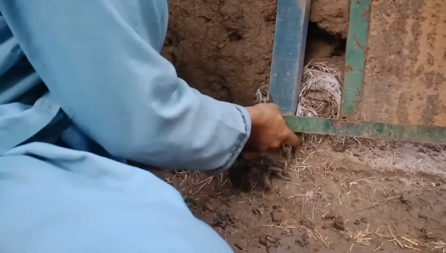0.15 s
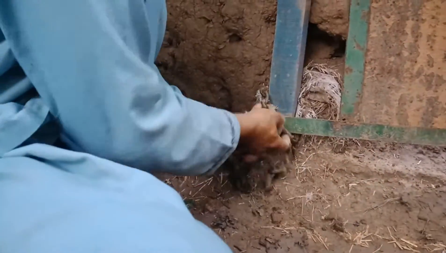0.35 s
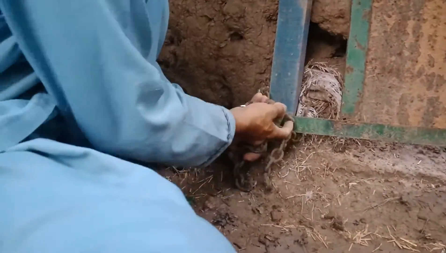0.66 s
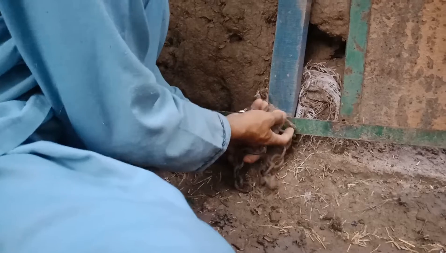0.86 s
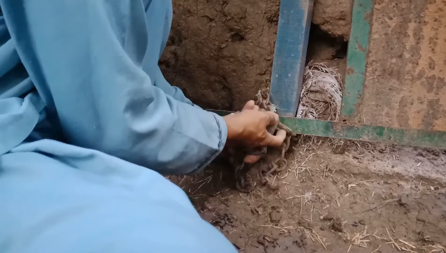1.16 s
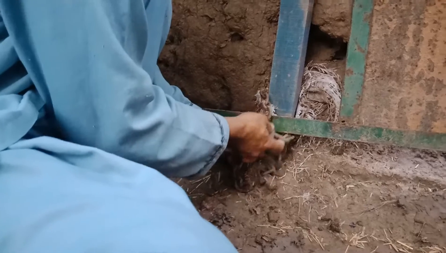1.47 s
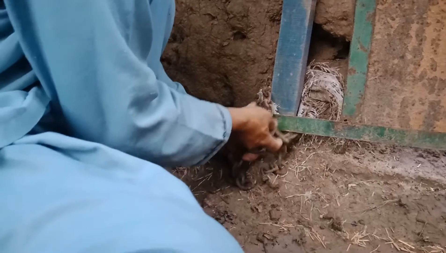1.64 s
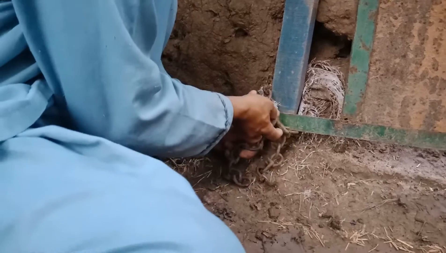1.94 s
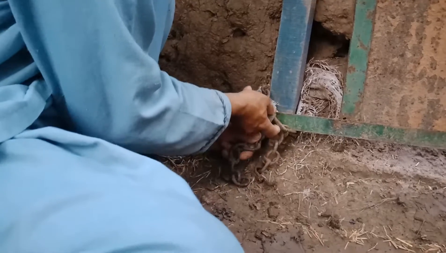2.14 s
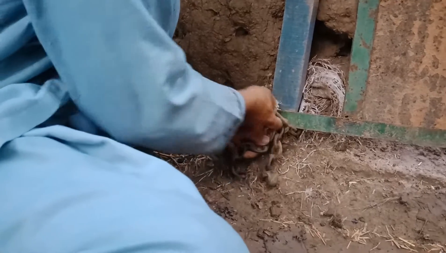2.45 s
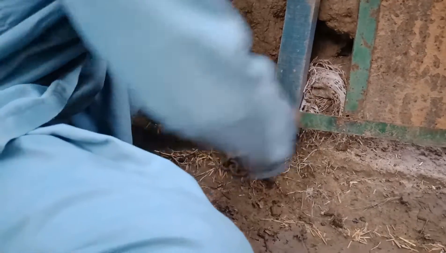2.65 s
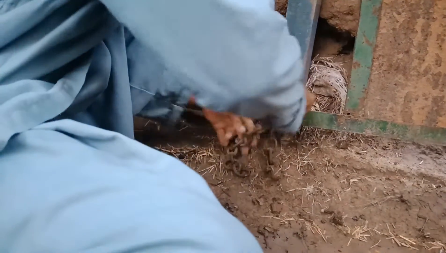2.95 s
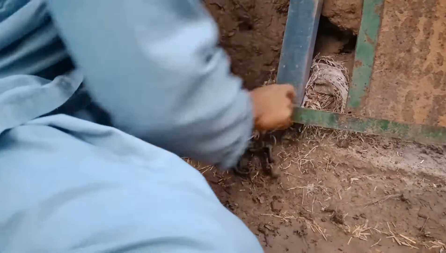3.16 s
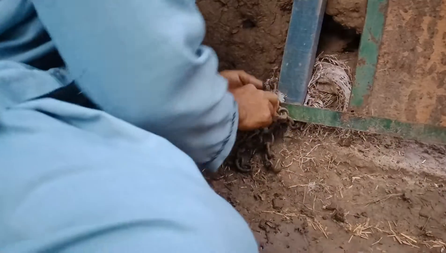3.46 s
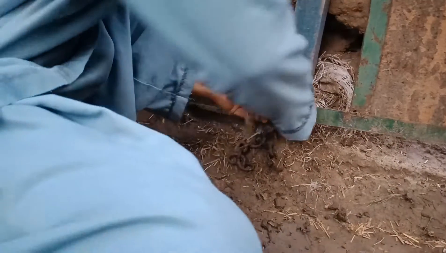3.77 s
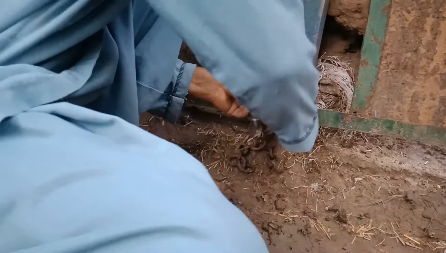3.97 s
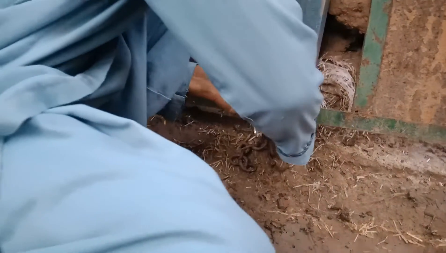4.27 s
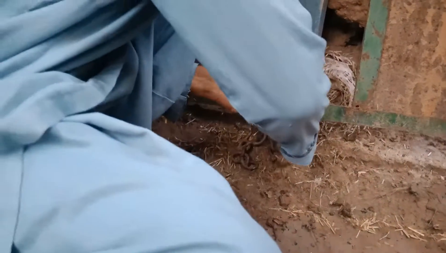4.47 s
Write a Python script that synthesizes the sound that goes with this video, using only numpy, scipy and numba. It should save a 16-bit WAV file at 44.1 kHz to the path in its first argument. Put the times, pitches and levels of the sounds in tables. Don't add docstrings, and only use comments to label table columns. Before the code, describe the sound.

Outdoor yard, stereo phone recording from roughly a metre. Heavy chain links knock a metal frame in irregular short bursts, each with a dry crack and brief hollow ring, mixed with gritty drags and tiny high link ticks. The strongest cluster comes just after the middle; then it thins to scattered clinks and a final medium clank. Continuous high cricket chorus rises and falls about every half second, over soft air hiss and low hum.

```python
import sys
import numpy as np
from scipy import signal
from scipy.fft import rfft, irfft
from scipy.io import wavfile
from scipy.ndimage import uniform_filter1d
from numba import njit

SR = 44100
rng = np.random.default_rng(int(sys.argv[2]) if len(sys.argv) > 2 else 0)


def invert_db(level):
    return 10 ** (np.asarray(level, dtype=float) / 20)


def to_wav(s):
    ch = np.atleast_2d(s).T
    pcm = np.round(np.clip(ch, -1, 1) * 32767)
    wavfile.write(sys.argv[1], SR, pcm.astype(np.int16))


N = 203256


def read(table, hz):
    t = np.array(table)
    return np.interp(np.log(hz), np.log(t[:, 0]), t[:, 1])


def level(x, db):
    return x * invert_db(db) / np.sqrt(np.mean(x ** 2))


def walk(rate):
    k = int(SR / rate)
    held = np.repeat(rng.standard_normal(N // k + 1), k)
    return 1.3 * uniform_filter1d(uniform_filter1d(held, k), k)[:N]


def peak(hz, width):
    return lambda f: 1 / (1 + (2 * (f - hz) / width) ** 2)


def dull(x, hz, order):
    return signal.sosfilt(signal.butter(order, hz, fs=SR, output="sos"), x)


def band_pass(x, low_hz, high_hz, order):
    return signal.sosfilt(signal.butter(order, [low_hz, high_hz], "bandpass", fs=SR, output="sos"), x)


# pitch_hz, likeness (0 to 1)
COHERENCE = [(60, 0.84), (130, 0.99), (290, 0.93), (640, 0.74), (1410, 0.16), (3100, 0), (6820, 0.01),
             (15000, 0)]


def noise(gain):
    hz = np.maximum(np.fft.rfftfreq(N, 1 / SR), 1)
    alike = np.clip(read(COHERENCE, hz), 0, 1)
    mid, side = rfft(rng.standard_normal((2, N))) * gain(hz)
    mid, side = mid * np.sqrt(1 + alike), side * np.sqrt(1 - alike)
    return irfft(np.array([mid + side, mid - side]), N)


# start_s (of the #
# peak), level_db, half_length_s
DRONE_SWELLS = [(0.02, -48.5, 0.059), (0.416, -54, 0.32), (1.044, -51.5, 0.13), (1.38, -55.5, 0.12),
                (1.654, -55, 0.16), (1.946, -53, 0.14), (2.308, -58, 0.17), (2.582, -46, 0.085),
                (2.9, -51, 0.19), (3.25, -52.5, 0.046), (3.552, -58, 0.068), (3.997, -58, 0.2),
                (4.426, -53, 0.053), (4.62, -53, 0.082)]


def throb():
    s, db, half = np.transpose(DRONE_SWELLS)[:, :, None]
    bells = np.exp(-2 * ((np.arange(N) / SR - s) / half) ** 2)
    return np.sqrt(np.sum(invert_db(db) ** 2 * bells, axis=0))


SWELL_TOPS = [-0.53, 0.08, 0.68, 1.32, 1.91, 2.53, 3.06, 3.69, 4.32, 4.75]


def swell():
    t = np.arange(N) / SR
    turn = 2 * np.pi * np.interp(t, SWELL_TOPS, np.arange(len(SWELL_TOPS)))
    depth_db = 5 - 0.68 * t
    db = depth_db * (np.cos(turn) - 0.084 * np.cos(2 * turn))
    pan_db = -9.5 - 0.17 * db + 1.0 * walk(6.75)
    return -45.5 + db, pan_db


# pitch_hz, width_hz, level_db
SHED_DRONE = [(146, 3.9, -62.5), (189.3, 9.6, -68), (226, 40, -66)]
# pitch_hz, width_hz, level_db
FAR_INSECTS = [(7640, 77, -80), (9140, 460, -83)]
# pitch_hz, level_db (per Hz)
AIR_SPECTRUM = [(3470, -31.5), (5900, -9), (6650, -28.5), (7490, -10), (7960, -25), (8120, -20.5),
                (9410, -13.5), (10300, -18), (14400, -17), (15300, -18.5)]


def yard():
    wobble = np.cumsum(82.5 * (1 + 0.016 * walk(9.42))) / SR
    drone = level(np.sin(2 * np.pi * wobble), 0) * throb() * invert_db(0.5 * walk(12))
    drone = drone + sum(level(noise(peak(hz, width)), db) for hz, width, db in SHED_DRONE)
    rumble = level(noise(lambda f: (f / 60) ** 2.0 / (1 + (f / 95) ** 8)), -61.5)
    far = sum(level(noise(peak(hz, width)), db) * invert_db(4.7 * walk(3.3)) for hz, width, db in FAR_INSECTS)
    swelling = invert_db(0.59 * (swell()[0] + 45.5) + 3)
    edges, hiss = np.geomspace(5700, 15480, num=15), 0
    for lo, hi in zip(edges, edges[1:]):
        band = noise(lambda f: invert_db(read(AIR_SPECTRUM, f)) * (f >= lo) * (f < hi))
        patchy_db = 5 if lo < 8400 else 1.5
        hiss = hiss + band * invert_db(patchy_db * walk(7)) * (swelling if lo < 7000 else 1)
    low = (drone + rumble) * invert_db(np.array([[-1.0], [1.0]]))
    return low + far + level(hiss, -71.5) * invert_db(np.array([[.6], [-.6]]))


# pitch_hz, strokes_per_s, level_db
SINGERS = [(5100, 13, -9), (4750, 14, -7.5), (4820, 200, -12.5), (5050, 39, -1), (5320, 48, -5),
           (5107, 38, -1), (5304, 48, -3), (5170, 85, -1), (5065, 86, 0.5), (5190, 73, -2),
           (5490, 54, -8.5), (5500, 53, -9)]


def crickets():
    db, pan_db = swell()
    out, t = np.zeros((2, N)), np.arange(int(.08 * SR)) / SR
    for hz, rate, own_db in SINGERS:
        phase = np.cumsum(rate * (1 + 0.0662 * walk(8))) / SR % 1
        stroke = np.sin(np.pi * np.clip(phase / 0.64, 0, 1)) ** 2
        pitch_hz = hz * (1 + .02 * (.35 - phase) + 0.0055 * walk(7))
        wing = np.sin(2 * np.pi * np.cumsum(pitch_hz) / SR)
        song = wing * stroke * invert_db(0.98 * walk(10.0))
        paths = rng.standard_normal((2, len(t))) * np.exp(-t / 0.014)
        heard = signal.fftconvolve(song[None], paths, axes=1)[:, :N]
        out += [level(c, own_db) for c in heard]
    far = level(noise(peak(5200, 565)), -1.4) * invert_db(0.092 * (db - np.mean(db)))
    out = level(out, 0) + far
    return level(dull(out, hz=5630, order=20), 2.04) * invert_db(db + np.array([pan_db, -pan_db]) / 2)


# start_s, level_db
DRAG_EFFORT = [(0.0, -40), (0.28, -52.5), (0.72, -54), (0.88, -60), (1.2, -57.5), (1.55, -58.5),
               (1.79, -55), (2.27, -54.5), (2.5, -53.5), (2.64, -39), (2.73, -42), (3.0, -49), (4.0, -58.5),
               (4.21, -56.5), (4.38, -50), (4.6, -58)]
# pitch_hz, level_db (per Hz)
DRAG_COLOUR = [(24, -63), (40, -12), (76, 5), (108, 1.5), (170, 2), (286, -2.5), (442, -9), (1770, -18),
               (4170, -22.5), (4600, -14.5), (5980, -27), (10100, -120)]
# low_hz, high_hz, level_db (at middle effort), slope (dB per dB of effort), flicker_db
DRAG_PARTS = [
    (470, 1860, -58.5, 1, 3.5),
    (99, 436, -55.5, 0.77, 2),
    (1780, 4180, -59, 0.87, 3.5),
]


def drag():
    s, effort = np.transpose(DRAG_EFFORT)
    effort_db = np.interp(np.arange(N) / SR, s, effort) + 54
    out = 0
    for lo, hi, db, slope, flicker_db in DRAG_PARTS:
        def gain(f):
            return invert_db(read(DRAG_COLOUR, f)) / np.sqrt((1 + (lo / f) ** 8) * (1 + (f / hi) ** 16))
        out = out + level(noise(gain), 0) * invert_db(db + slope * effort_db + flicker_db * walk(20))
    return out * invert_db(np.array([[-1.2], [1.2]]))


# start_s, length_s, level_db, pitch_hz (band centre), width_octaves
SCRAPES = [(0.056, .09, -50, 3100, 2.8), (0.072, .07, -41, 1220, 0.83), (0.19, .12, -48, 1000, 1.8),
           (0.46, 0.19, -50.5, 1250, 2), (0.6, 0.31, -51.5, 870, 1.6), (1.07, 0.15, -55.5, 1430, 0.67),
           (1.05, 0.059, -49, 3700, 0.91), (1.157, 0.11, -55, 3500, 0.74), (2.46, 0.098, -51, 1310, 0.92),
           (2.502, 0.19, -42.5, 2200, 0.96), (2.724, 0.11, -30.5, 2600, 0.91), (2.74, 0.31, -40, 430, 1.6),
           (3.803, .08, -56, 1300, 1.6), (4.28, 0.11, -42.5, 1500, 2.4), (1.797, .07, -36, 3200, 0.8),
           (0.68, .08, -50, 3000, 1.1), (0.785, .06, -49, 3000, 0.99), (2.501, 0.025, -28, 1500, 2.2),
           (2.521, 0.12, -36.5, 700, 1), (3.2, .08, -48, 1200, 1.8), (3.446, .08, -53, 1000, 1.3),
           (4.292, 0.053, -41, 860, 0.91), (0.475, .08, -52, 2800, 1.2), (2.36, 0.22, -54, 2000, 2.6),
           (0.047, 0.064, -46, 700, 1.7), (2.748, .06, -28.5, 1200, 2.4), (0.552, 0.088, -45, 1700, 1.3),
           (1.793, 0.056, -42, 1350, 1.9), (4.04, 0.12, -55, 3000, 1.1), (3.143, .05, -52, 3200, 1.1)]


def scrapes():
    out = np.zeros((2, N))
    t = np.arange(int(.5 * SR)) / SR
    for s, length, db, hz, octaves in SCRAPES:
        grit = rng.standard_normal((3, len(t)))
        shared = grit[0] * np.clip(700 / hz, 0, 1.5)
        grit = (shared + grit[1:]) * invert_db(walk(150)[:len(t)])
        low_hz, high_hz = hz * 2 ** (np.array([-.5, .5]) * max(octaves, .2))
        band = band_pass(grit, low_hz, high_hz, order=2)
        envelope = (1 - np.exp(-t / 0.0055)) * np.exp(-(t / length) ** 2 * 2)
        i = int(s * SR)
        out[:, i:i + len(t)] += (level(band, db) * envelope)[:, :N - i]
    return dull(out, hz=4840, order=8) * invert_db(np.array([[-2.2], [2.2]]))


@njit
def add(out, start, push, pole, left, right, steps):
    for m in range(len(pole)):
        z = 0j
        for i in range(min(steps[m], out.shape[1] - start)):
            z = z * pole[m] + (push[i] if i < len(push) else 0.)
            out[0, start + i] += (left[m] * z).imag
            out[1, start + i] += (right[m] * z).imag


def strike(out, s, push, hz, t60, gain, chance, pan_db):
    alike = np.clip(read(COHERENCE, hz), 0, 1)
    phase = 3 * chance[0]
    apart = np.pi / 2 * np.sign(chance[2]) + .4 * chance[3]
    mid = np.sqrt(2 + 2 * alike) * np.exp(1j * phase)
    side = np.sqrt(2 - 2 * alike) * np.exp(1j * (phase + apart))
    left = gain * (mid + side) * invert_db(pan_db / 2)
    right = gain * (mid - side) * invert_db(-pan_db / 2)
    pole = np.exp(2j * np.pi * hz / SR - np.log(1000) / (t60 * SR))
    steps = (len(push) + .65 * t60 * SR).astype(np.int64)
    add(out, int(s * SR), push, pole, left, right, steps)


def press(hz, seconds):
    t = np.arange(int(seconds * SR)) / SR
    push = np.hanning(len(t)) * sum(np.sin(2 * np.pi * f * t) for f in hz)
    return 4 * push / len(t)


def rattle(length):
    t = np.arange(int(.15 * SR)) / SR
    grit = rng.standard_normal((2, len(t)))
    length = np.clip(length, .001, .04)
    decay = np.exp(-t / length) + 2.36 * np.exp(-t / 0.0027)
    push = grit[0] * invert_db(4.7 * grit[1]) * (1 - np.exp(-t / 0.00083)) * decay
    return (push / np.sqrt(np.sum(push ** 2)))[:int(6 * length * SR) + 400]


# start_s, level_db (peak), upper_db (share of the upper modes)
TINKLES = [(0.1251, -50, 5), (0.1494, -64, -5), (0.2064, -47.5, -10), (0.2488, -41, -12),
           (0.635, -28.5, -12), (2.7244, -57, -6), (2.9931, -49, -5), (3.0614, -64, -2), (3.1094, -56, -8),
           (3.6915, -41, -3), (3.719, -40, 5), (3.7994, -56, -4)]
# pitch_hz, level_db, t60_s
LINK_MODES = [(8000, 0.5, 0.016), (9940, -13.5, 0.023), (10900, -13, 0.14), (14800, -16, 0.1)]


def links():
    out, modes = np.zeros((2, N)), np.array(LINK_MODES)
    upper = modes[:, 0] > modes[0, 0]
    for s, db, upper_db in TINKLES:
        chance = rng.standard_normal((5, len(modes)))
        gain = invert_db(db - 7.5 + modes[:, 1] + np.clip(upper_db, -30, 4) * upper)
        hz = modes[:, 0] * (1 + 0.003 * chance[4])
        strike(out, s - .002, press(hz, 0.0065), hz, modes[:, 2], gain, chance, pan_db=-1.0)
    return out


# start_s, level_db (peak), pitch_hz, t60_s
TICKS = [(0.0427, -30, 7000, 0.061), (0.0994, -37, 6380, 0.099), (0.4694, -51, 6430, 0.07),
         (0.6789, -42, 5960, 0.06), (0.7093, -48, 7600, 0.06), (0.791, -36, 6130, 0.051),
         (1.6287, -41, 6160, 0.053), (1.7943, -61, 5940, 0.054), (2.5006, -31.5, 6000, 0.16),
         (2.737, -30, 6430, 0.14), (2.9944, -33, 6120, 0.072), (3.048, -48, 6830, 0.17),
         (3.148, -42, 6400, 0.068), (3.294, -31, 6650, 0.11), (3.3194, -54, 6390, 0.06),
         (4.2924, -70, 6000, 0.06)]


def ticks(count=24):
    out = np.zeros((2, N))
    for s, db, hz, t60 in TICKS:
        chance = rng.standard_normal((5, count))
        cluster = hz * (1 + 0.045 * chance[4])
        t60s = np.full(count, max(t60, .01))
        strike(out, s - .001, rattle(0.0017), cluster, t60s, invert_db(db - 26.5), chance, pan_db=-1.5)
    return band_pass(out, 5600, 8200, order=4)


# start_s, pitch_hz, t60_s,
# level_db (peak)
BAR_STRIKES = [(0.045, 2910, 0.042, -24), (.0831, 2870, .121, -34), (0.089, 1290, 0.088, -29.5),
               (.1865, 770, 0.034, -26.5), (.4155, 860, 0.12, -36), (.5491, 3200, 0.18, -26),
               (0.55, 1510, 0.46, -33.5), (.5531, 771, 0.2, -30.5), (0.6754, 514, 0.34, -40),
               (.7111, 4680, .041, -40), (0.7465, 205, 0.38, -42.5), (0.7803, 208.3, 0.33, -31.5),
               (.7921, 763, 0.056, -27.5), (1.061, 1310, 0.36, -45), (1.0844, 1520, 0.19, -41),
               (1.794, 2673, 0.25, -22), (1.7957, 3250, 0.2, -22), (1.7967, 3900, 0.21, -23.5),
               (1.802, 1864, 0.44, -35), (1.8016, 1348, 1, -41.5), (1.8061, 2240, 0.58, -38),
               (1.8225, 520, 0.8, -37.5), (2.5001, 755, 0.17, -17.5), (2.5036, 2470, .061, -23),
               (2.5114, 1250, 0.35, -26.5), (2.5212, 214, 0.14, -24), (2.7341, 768, 0.18, -16.5),
               (2.7361, 2280, 0.27, -24.5), (2.7375, 2720, 0.17, -21.5), (2.7422, 224.3, 0.2, -22),
               (2.7427, 1730, 0.22, -13.5), (2.7549, 422, 0.082, -22.5), (2.782, 293.8, 0.21, -26.5),
               (2.7894, 152.2, 1, -34.5), (3.2911, 794, 0.053, -33.5), (3.292, 4120, .071, -37),
               (3.3196, 1340, .151, -48), (3.4476, 4060, .051, -32.5), (3.4501, 3730, 0.13, -36),
               (3.4531, 795, 0.092, -34.5), (3.6661, 3600, 0.39, -47.5), (3.8101, 2860, 0.13, -45),
               (4.1616, 2790, 0.094, -43.5), (4.292, 3920, .051, -25), (4.2921, 800, 0.099, -23.5),
               (4.2931, 3460, .046, -22), (4.2959, 221, 0.18, -31.5), (4.3007, 2440, 0.19, -29),
               (4.3065, 1335, 0.49, -34.5),
               (0.066, 219, 0.084, -36), (0.088, 246, 0.069, -33.5), (0.31, 850, .08, -44),
          (0.436, 1040, 0.068, -39), (0.57, 214, 0.13, -37.5), (1.097, 225, 0.09, -42),
          (1.795, 2500, .15, -27), (1.797, 454, 0.15, -35.5), (1.83, 524, .3, -39), (2.502, 2035, .08, -25),
          (2.535, 1790, .12, -24), (2.575, 846, 0.14, -30), (2.80, 630, 0.12, -31),
          (3.299, 1020, 0.087, -37), (3.304, 226, 0.059, -37), (3.345, 1360, 0.065, -39),
          (3.447, 221, 0.13, -38.5), (3.5, 426.5, 0.26, -44.5), (3.69, 945, .15, -53),
          (4.3, 325, 0.23, -39)]


def bars():
    out = np.zeros((2, N))
    for s, hz, t60, db in BAR_STRIKES:
        cluster = hz * (1 + np.array([-.003, .004, -.03, 0.043]))
        t60s = t60 * np.array([0.89, 0.91, 1.0, 1.0])
        gain = invert_db(db - 12 + np.array([2.5, -5.0, -13, -6.0]))
        chance = rng.standard_normal((4, 4)) * [[.15], [1], [1], [1]]
        strike(out, s, press([hz], 0.0017 + 2.04 / hz), cluster, t60s, gain, chance, pan_db=-2.0)
    return dull(out, hz=5450, order=10)


# pitch_hz, level_db, t60_s
DOOR_MODES = [(189, -9, 0.17), (223.4, 5, 0.48), (283, -1, 0.22), (430.2, 3, 0.42), (510, -4.5, 0.83),
              (607, -7.5, 0.31), (768, 0, 0.61), (846, -9, 0.68), (997, -2.5, 0.45), (1250, -0.5, 0.27),
              (1316, 5.5, 0.41), (1459, -4, 0.55), (1510, -6, 0.2), (1756, -6.5, 0.21), (1772, 1, 0.42),
              (2080, -7, .33), (2300, -8.5, 0.2), (2723, -0.5, 0.16), (2980, -6, 0.16), (3270, 4, 0.27),
              (3370, 0.5, 0.26), (3900, 0.5, 0.16), (4155, 7.5, 0.1)]
# pitch_hz, level_db (per Hz)
SHEET = [(35, -46), (60, -33), (218, 0.5), (255, -8), (428, -6.5), (667, -8), (800, -5), (1060, -10.5),
         (1280, -8), (1590, -7.5), (1750, -10.5), (1920, -12.5), (3930, -11), (5240, -29), (6000, -23.5),
         (7800, -62), (13200, -120)]
# pitch_hz, t60_s
SHEET_T60 = [(100, 0.78), (300, 0.58), (800, 0.47), (1600, 0.35), (3000, 0.18), (6000, 0.19)]


def knock(out, s, db, boom_db, bright_db, length, ring, count):
    strong = np.array(DOOR_MODES)
    chance = rng.standard_normal((6, count + len(strong)))
    dense = 70 + 6000 * np.abs((np.arange(count) + .3 * chance[4, :count]) / count) ** 1.5
    hz = np.r_[dense, strong[:, 0]]
    t60 = np.r_[read(SHEET_T60, dense) * invert_db(1.5 * chance[5, :count]), strong[:, 2]]
    body = invert_db(read(SHEET, dense)) * np.sqrt(np.sqrt(dense) ** 0.58 / t60[:count])
    body = np.r_[body / np.sqrt(np.sum(body ** 2)), invert_db(strong[:, 1] - 21)]
    tilt = [(350, boom_db + 11.5), (800, 0.5 * (boom_db + 16.5)), (1500, 0.0057), (2900, bright_db + 11.5)]
    gain = body * invert_db(db - 11.5 + read(tilt, hz))
    pan_db = read([(900, -1.1), (2500, -4.5)], hz)
    push = rattle(length)
    strike(out, s - .001, push, hz, t60 * np.clip(ring, .15, 2), gain, chance, pan_db)
    return int(s * SR), push * invert_db(db + bright_db)


# start_s, level_db (peak),
# boom_db, bright_db
NUDGES = [(0.105, -43.5, 4.5, -31.5), (0.229, -29.5, -24, -19), (0.308, -36, -1.5, -37),
          (0.417, -39, -7, -41), (0.455, -35, -10.5, -24), (0.49, -28.5, -14, -20), (0.66, -36, -12, -8),
          (0.705, -43, -8, -7), (1.049, -37, -21.5, -4.5), (1.176, -56, -22, -2), (1.411, -48, -3.5, -23),
          (1.559, -40.5, -8, -21), (1.623, -35, -20, -27), (2.021, -62, 11.5, -19),
          (2.259, -32.5, -18, -20.5), (2.414, -41, -1, -7), (2.446, -26.5, -11, -17),
          (2.796, -35.5, 0, -15), (2.991, -38.5, 1, -9), (3.143, -35.5, -42.5, -9.5), (3.668, -59, -6, 3),
          (3.813, -38.5, -7, -18), (4.158, -38.5, -26, -16), (4.275, -22.5, -16, -28),
          (4.539, -39.5, -9.5, -14.5),
          (0.003, -29.5, -20, -30), (0.135, -33, -21, -20), (0.598, -30.5, -14, -20),
           (0.632, -30.5, -20, -14), (0.768, -33.5, -6.5, -25), (0.793, -44, -8, -2), (0.857, -42, -3, -35),
           (0.879, -47.5, -5, -32), (0.932, -52, -12, -11), (1.098, -44.5, -9, -6),
           (1.728, -53.5, -4.5, -20), (1.85, -32, -17, -10), (2.535, -28, -11.5, -16),
           (2.62, -39, -16, -12.5), (3.212, -60, -8, -26), (3.315, -40.5, -9, -19), (4.335, -32, -13, -26)]
# start_s, level_db (peak), boom_db, bright_db, length_s (of the rattle)
BLOWS = [(0.043, -26.5, -13, -1, 0.029), (0.076, -29, -8, -6, 0.022), (0.186, -32.5, -5, -26, 0.02),
         (0.548, -16.5, -30, -11, 0.0016), (0.781, -33, -3, -11, 0.012), (1.7915, -15.5, -29, -9.5, 0.02),
         (2.498, -12.5, -15, -7, 0.015), (2.577, -24.5, -3.5, -13.5, 0.0038),
         (2.724, -11.5, -12.5, -17.5, 0.012), (2.731, -9, -18.5, -13.5, 0.011),
         (2.756, -17, -15.5, -12, 0.0057), (3.29, -27, -19, -8.5, 0.014), (3.445, -29, -10, -9.5, 0.0048),
         (4.292, -22.5, -17.5, -5, 0.012)]


def door():
    out, edge, contacts = np.zeros((2, N)), np.zeros(N), []
    for row in BLOWS:
        contacts.append(knock(out, *row, ring=1.07, count=460))
    for row in NUDGES:
        contacts.append(knock(out, *row, length=0.012, ring=1.12, count=170))
    for i, push in contacts:
        edge[i:i + len(push)] += push[:N - i]
    paths = rng.standard_normal((2, 900)) * np.exp(-np.arange(900) / SR / 0.004)
    crack = signal.fftconvolve(edge[None], paths, axes=1)[:, :N] * invert_db(-34.5)
    return dull(out, hz=5450, order=10) + band_pass(crack, 6300, 14500, order=3)


def scene():
    return yard() + crickets() + drag() + scrapes() + links() + ticks() + bars() + door()


def roll_off(x):
    return signal.sosfilt(signal.butter(12, 15480, fs=SR, output="sos"), x)


def record(dry):
    mix = signal.sosfilt(signal.butter(N=2, Wn=38, btype="highpass", fs=SR, output="sos"), dry)
    return roll_off(mix)


dry = scene()
out = record(dry)
to_wav(out)
```